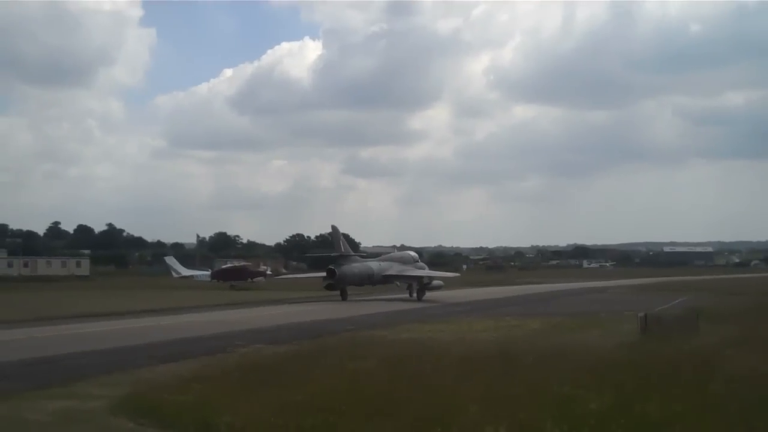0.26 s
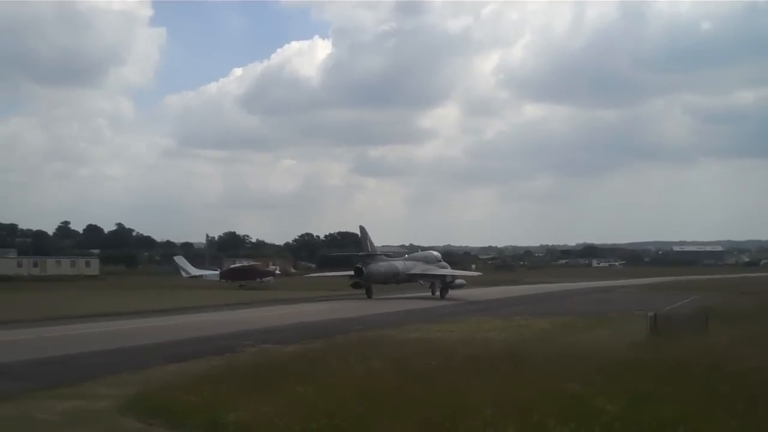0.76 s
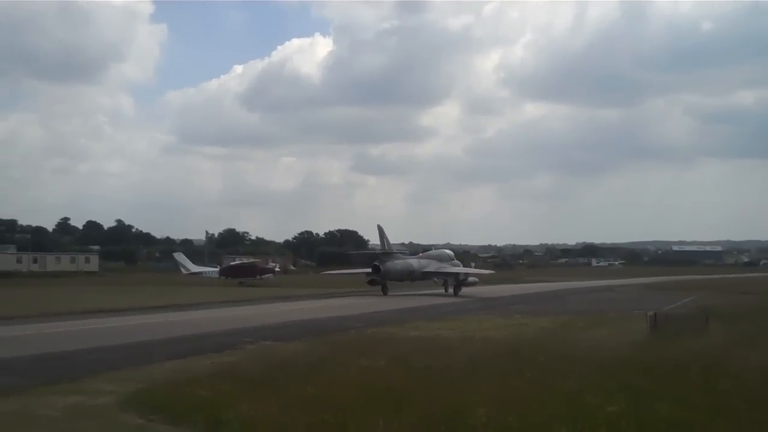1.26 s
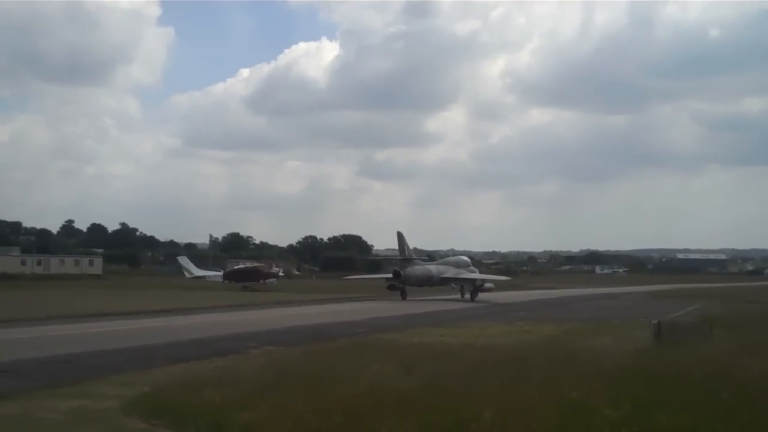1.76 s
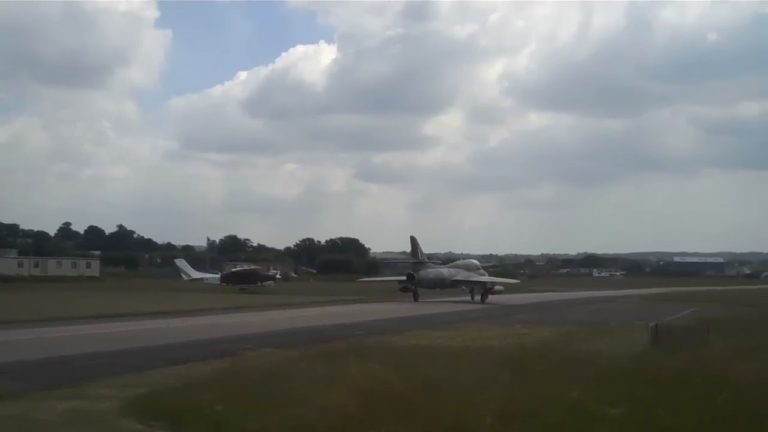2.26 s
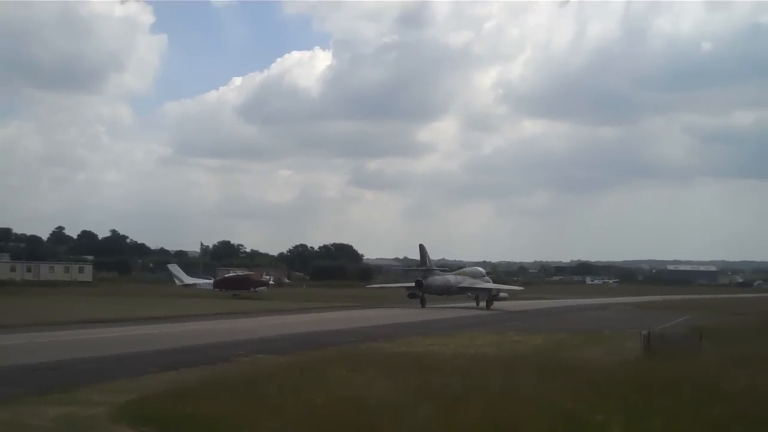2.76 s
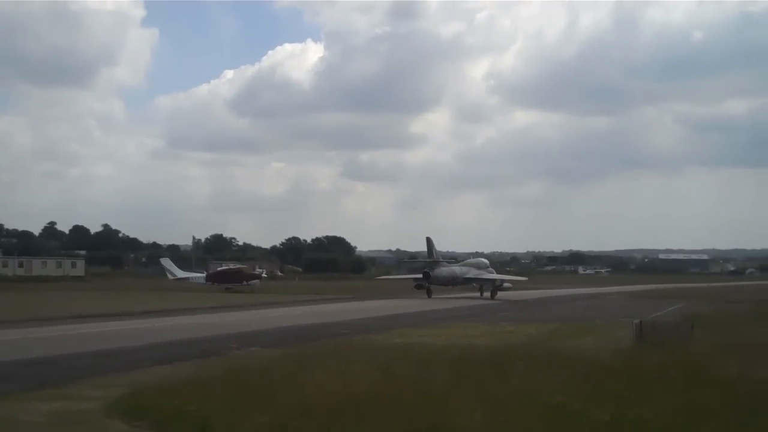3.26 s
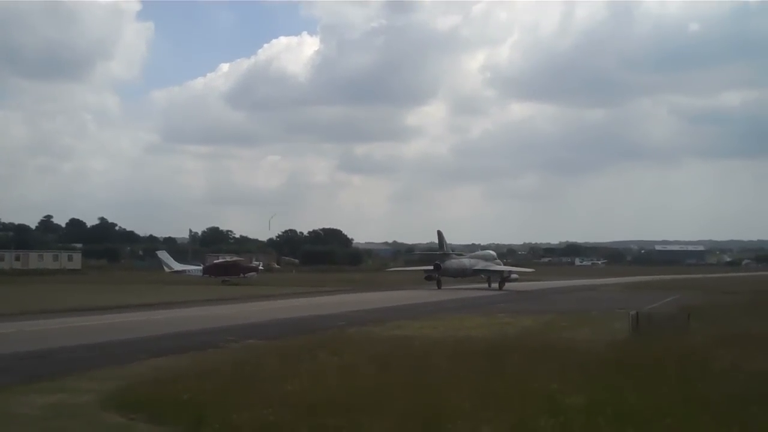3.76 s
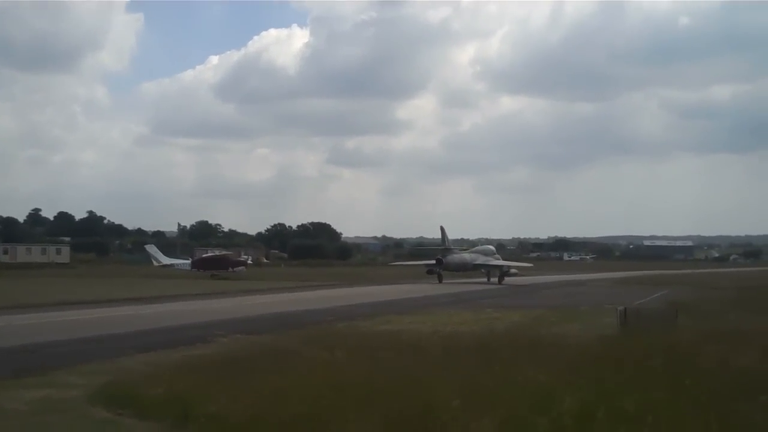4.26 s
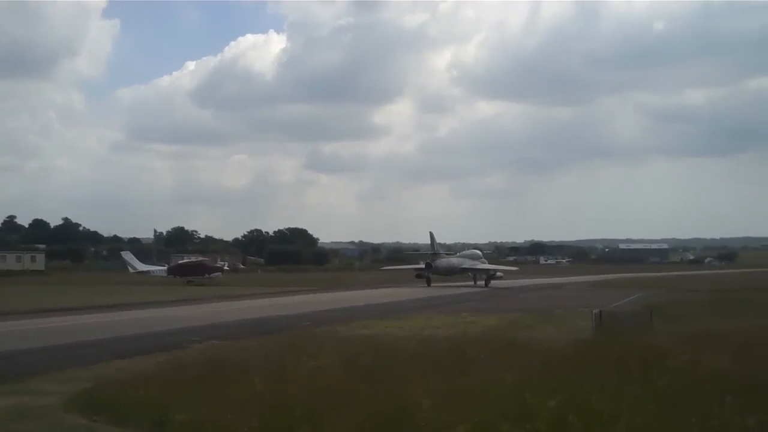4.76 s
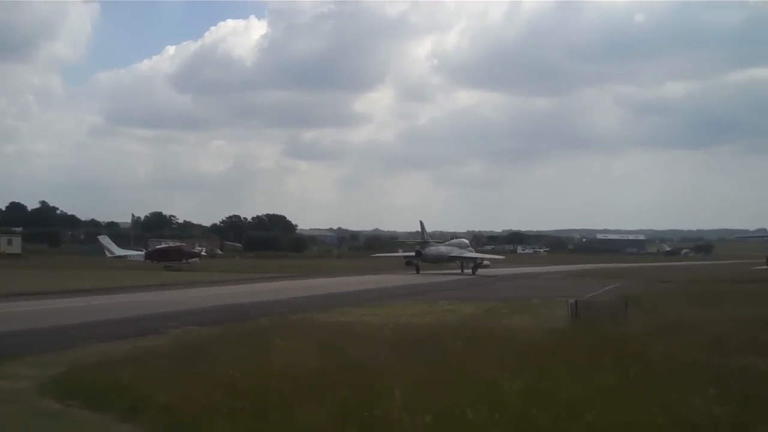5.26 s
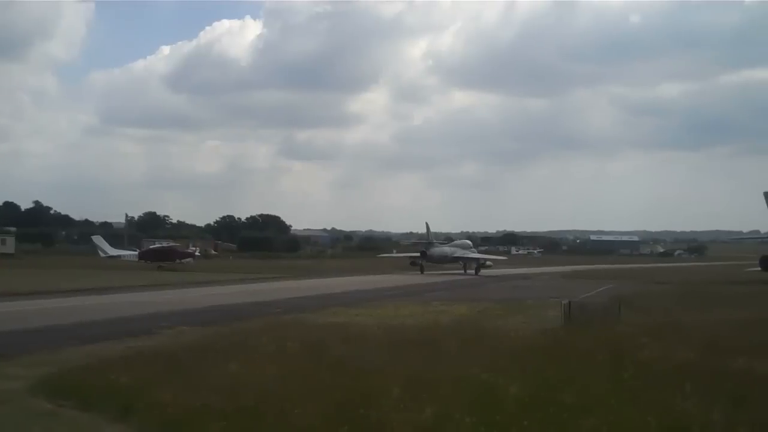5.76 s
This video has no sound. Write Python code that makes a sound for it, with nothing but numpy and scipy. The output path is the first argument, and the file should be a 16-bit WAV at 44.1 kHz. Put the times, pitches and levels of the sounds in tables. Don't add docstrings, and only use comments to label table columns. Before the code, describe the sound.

An outdoor stretch of about six seconds, already under way at the start: a jet aircraft taxies away over an open airfield. Its loud, broad roar has a hollow, ringing middle and a bright airy hiss. Above it sits a thin, piercing whine with several higher companion tones, glinting and breaking up in the turbulent air. The whine holds for about half a second, then glides steadily down, ending roughly a quarter lower. Around 2.8 s the jet's tone shifts slightly as its tail swings away; the roar and hiss keep fading, leaving the whine more exposed. Everything flutters in quick uneven swells. Low wind rumble and soft thumps strike a small bare microphone near 0.15, 1, 2 and 3 s; a dense burst of hard knocks and crackly snaps comes from about 4.1 to 4.6 s, followed by smaller bumps near 4.8 and 5.2 s. The engine is still audible at the end.

```python
import sys
import numpy as np
from scipy import signal
from scipy.fft import rfft, irfft
from scipy.io import wavfile
from scipy.ndimage import uniform_filter1d

SR = 44100
rng = np.random.default_rng(int(sys.argv[2]) if len(sys.argv) > 2 else 0)


def master_out(mix):
    frames = np.transpose(np.atleast_2d(mix))
    ceiling = np.clip(frames, -1, 1)
    pcm = np.round(ceiling * 32767).astype(np.int16)
    wavfile.write(sys.argv[1], SR, pcm)


def boost(x):
    u = np.asarray(x, float) / 20
    return 10 ** u


N = 264600
FRAME, HOP = 1024, 256

# middle_s, half_length_s
TAIL_SWING = (2.77, 0.13)


def clock():
    return np.arange(N) / SR


def evened(x):
    return x / np.sqrt(np.mean(x ** 2) + 1e-20)


def bell(x, middle, half):
    return np.exp(-((x - middle) / half) ** 2 / 2)


def humps(rows, stretch=0.94, share=0.95):
    t = clock()[::HOP]
    level_db = sum(share * db * bell(t, s, stretch * half) for s, half, db in rows)
    return np.interp(clock(), t, level_db)


def drift(rate_hz):
    draws_hz = 600
    count = N * draws_hz // SR + 1
    z = rfft(rng.standard_normal(count))
    hz = np.fft.rfftfreq(count, 1 / draws_hz)
    slow = evened(irfft(z * np.exp(-(hz / rate_hz) ** 2), count))
    return np.interp(np.linspace(0, count - 1, N), np.arange(count), slow)


def receding(layer, turn):
    start_db, fade_db, turn_db = layer
    middle_s, half_s = turn
    turned = (1 + np.tanh((clock() - middle_s) / half_s)) / 2
    return boost(start_db + fade_db * clock() + turn_db * turned)


def spectrum(points):
    f, level_db = np.transpose(points)
    hz = np.fft.rfftfreq(FRAME, 1 / SR)[:, None]
    return boost(np.interp(np.log(hz + 1), np.log(f + 1), level_db, -150, -150))


def resonances(peaks, shift_hz=np.zeros(N)):
    hz = np.fft.rfftfreq(FRAME, 1 / SR)[:, None] - np.pad(shift_hz[::HOP], (0, 4), "edge")
    power = sum(boost(2 * db) / (1 + (2 * (hz - f) / width) ** 2) ** 2.0 for f, width, db in peaks)
    return np.sqrt(power)


def noise(gain, patchy_db, flicker_db, flicker_hz):
    a, b = rng.standard_normal((N // HOP + 5, FRAME // 2 + 1, 2), np.float32).T
    patches = uniform_filter1d(uniform_filter1d(a[::-1], size=10, axis=0), size=10, axis=1)
    z = (a + 1j * b) * gain * boost(patchy_db * evened(patches))
    x = signal.istft(z, nperseg=FRAME, noverlap=FRAME - HOP)[1][:N]
    return evened(x * boost(flicker_db * drift(flicker_hz)))


def tone(hz, scattered, twinkle_hz):
    phase = 2 * np.pi * np.cumsum(hz) / SR
    in_phase = 1 + scattered * drift(twinkle_hz)
    quadrature = scattered * drift(twinkle_hz)
    return evened(in_phase * np.cos(phase) + quadrature * np.sin(phase))


def compressor():
    # time_s, first_stage_hz
    spool = [(0, 5792), (.55, 5790), (1, 5612), (1.5, 5457), (2, 5313), (2.5, 5195), (2.85, 5120),
             (3, 5104), (3.55, 5010), (4, 4835), (4.5, 4658), (5, 4534), (5.5, 4419), (6, 4330)]
    # ratio_to_first_stage, level_db
    neighbours = [(1.0635, -5), (1.089, -5.5), (1.03, -14), (1.135, -12)]
    rear_stages = [(1.283, -24), (1.325, -2), (1.358, 4), (1.447, -20), (1.544, 1), (1.642, 5), (1.732, -2),
                   (1.998, -1)]
    # middle_s, half_length_s, gain_db
    glints = [(0.0, 0.02, 9), (0.07, 0.028, 5), (0.16, 0.02, -4.5), (0.32, 0.02, 8.0), (0.65, 0.18, -5.5),
              (0.67, 0.02, 5.0), (0.83, 0.02, 6.5), (1.57, 0.03, 5), (1.0, 0.02, 5), (1.11, 0.066, 4.5),
              (1.36, 0.04, 4), (1.45, 0.02, 4), (1.66, 0.035, 9), (2.11, 0.096, 7.5), (2.35, 0.02, 11),
              (2.48, 0.023, -12), (2.54, 0.23, 8.5), (2.6, 0.028, 4), (2.78, 0.02, 7), (2.91, 0.018, -16),
              (3.05, 0.023, -17), (3.16, 0.018, -3), (3.18, 0.2, 14), (3.36, 0.028, -14), (3.51, 0.017, 11),
              (3.59, 0.022, 1), (3.65, 0.02, -3.5), (3.7, 0.02, 3), (3.75, 0.02, -7.5), (3.95, 0.02, 8.5),
              (4.04, 0.02, -5.0), (4.11, 0.1, 8), (4.25, 0.025, 6.5), (4.36, 0.047, -10), (4.52, 0.069, 12),
              (4.56, 0.019, -5), (4.61, 0.02, 5.5), (4.72, 0.02, -9.5), (4.81, 0.028, 6.5),
              (5.01, 0.018, -8.0), (5.05, 0.11, 8.5), (5.12, 0.018, 7), (5.3, 0.02, -12), (5.4, 0.03, 7),
              (5.5, 0.015, -9), (5.61, 0.02, 6), (5.75, 0.02, -11), (5.89, 0.18, 4),
              (2.87, .04, 6), (3.0, .04, 7), (4.15, .04, 3), (4.275, .02, 4), (1.15, .04, 3), (1.85, .08, 1)]
    # middle_s, half_length_s
    inlet_swing = (0.74, 0.79)
    rear_swing = (3.6, 0.49)
    # start_db, fade_db_per_s, turn_gain_db
    first_level = (-49, -1.4, 11.7)
    near_level = (-53.5, -0.18, 12)
    rear_level = (-61, 0, 5.5)

    hz = np.interp(clock(), *np.transpose(spool))
    glint_db = humps(glints, share=.95)
    first = receding(first_level, inlet_swing) * boost(glint_db) * tone(hz, .6, 65)
    near = sum(boost(db) * tone(ratio * hz, 0.94, 22) for ratio, db in neighbours)
    rear = 0
    for ratio, db in rear_stages:
        absorbed_db = 3 * np.maximum(ratio * hz / 1000 - 7.4, 0)
        rear = rear + boost(db - absorbed_db) * tone(ratio * hz, 1.4, 45)
    lowpass = signal.butter(3, 330, fs=SR, output="sos")
    wake = evened(signal.sosfilt(lowpass, rng.standard_normal(N)))
    hump = wake * np.cos(2 * np.pi * np.cumsum(1.07 * hz) / SR) * boost(2.0 * drift(24))
    stages = receding(near_level, inlet_swing) * (near + boost(6.0) * hump)
    return first, stages + receding(rear_level, rear_swing) * rear


def exhaust():
    # pitch_hz, density_db
    low_roar = [(320, -14), (430, -10), (520, -3.5), (610, -2.5), (720, -11), (800, -16.5), (900, -43)]
    high_roar = [(900, -9), (1030, -4), (1200, 1), (1450, 2), (1600, 2), (1750, -17)]
    # start_db, fade_db_per_s, turn_gain_db
    low_level = (-37.5, -1.48, -5.5)
    high_level = (-35, -2.28, 4.3)
    low = receding(low_level, TAIL_SWING) * noise(spectrum(low_roar), 0.65, 0.76, 11)
    high = receding(high_level, TAIL_SWING) * noise(spectrum(high_roar), 1.3, 0.2, 21)
    return low + high


def pipe():
    # pitch_hz, width_hz, level_db
    first_mode = [(906, 323, 0)]
    second_mode = [(1950, 480, 0), (1720, 140, -8.5)]
    fourth_mode = [(3388, 500, 0)]
    # offset_hz, width_hz, level_db
    third_mode = [(89, 480, 0.91), (-220, 210, -0.9)]
    # start_db, fade_db_per_s, turn_gain_db
    mode_levels = [
        (-35.5, -0.65, -7),
        (-24.5, -2.5, 0.7),
        (-26, -3, 2.5),
        (-31.5, -1.74, 0),
    ]
    third_hz = 2718 + 60.5 * drift(2.5)
    shapes = [resonances(first_mode), resonances(second_mode),
              resonances(third_mode, third_hz), resonances(fourth_mode)]
    return sum(receding(level, TAIL_SWING) * noise(shape, 1.1, .6, 25)
               for level, shape in zip(mode_levels, shapes))


def intake():
    # pitch_hz, density_db
    body_points = [(3300, -29), (3700, 2.5), (4200, 4), (5000, 3), (5800, 0), (6400, -27), (7000, -39)]
    fizz_points = [(3530, -63), (6000, 0.5), (6360, 0.5), (7420, -2), (11000, -11), (13800, -22)]
    # start_db, fade_db_per_s, turn_gain_db
    body_level = (-33, -2.98, 3.2)
    fizz_level = (-34.5, -2.1, 2.76)
    body = receding(body_level, TAIL_SWING) * boost(6) * noise(spectrum(body_points), 1.8, .6, 20)
    fizz = receding(fizz_level, TAIL_SWING) * noise(spectrum(fizz_points), 2.25, 0.17, 26)
    return boost(0.9 * drift(19)) * (body + fizz)


def swelling_and_dipping(x):
    # middle_s,
    # half_length_s, gain_db, centre_hz, half_width_octaves
    swells_and_dips = [(0.048, 0.062, 4.5, 2420, 0.26), (0.893, 0.11, 4, 6760, 0.47), (1.15, 0.043, 4.5, 3600, 0.84),
                             (1.27, 0.11, 7, 1890, 0.25), (1.445, .07, 2.5, 2050, 0.07), (1.59, 0.041, 8, 2980, 0.22),
                             (1.874, 0.31, 5, 627, 0.27), (1.98, 0.17, 7, 1370, 0.14), (2.337, 0.13, 6, 870, .2),
                             (2.346, 0.3, 3.5, 9060, 0.74), (2.545, 0.056, 6.5, 3030, 0.37),
                             (2.774, 0.063, 6.5, 2080, 0.1), (3.078, 0.047, 7, 1960, 0.042), (3.3, 0.055, 8, 2630, 0.13),
                             (3.24, 0.055, 4, 7900, 0.46), (3.28, 0.21, 3, 705, 1.04), (3.54, 0.037, 5, 2900, 0.25),
                             (3.72, 0.078, 12.5, 2390, 0.11), (3.996, 0.064, 4, 5860, 2), (4.158, 0.037, 7.5, 2070, 0.13),
                             (4.625, 0.11, 2.5, 1950, 0.25), (4.933, 0.27, 5, 1120, 0.33), (5.442, 0.18, 5, 1000, 0.12),
                             (5.984, 0.026, 2.5, 1120, 1.4),
                             (0.158, 0.044, -9, 2650, 0.26), (.43, 0.026, -5.7, 2380, 0.13), (0.476, 0.21, -6, 3360, 1.55),
                       (0.612, 0.043, -9, 1270, .16), (0.644, 0.041, -12, 2060, 0.068),
                       (0.877, 0.025, -3.5, 1770, .4), (1.01, 0.094, -3.5, 3340, 0.34), (1.172, 0.028, -9, 940, 0.23),
                       (1.29, 0.038, -7, 2240, 0.13), (1.64, 0.07, -7.5, 2420, 0.46), (1.937, 0.1, -3, 1060, 4.7),
                       (2.66, 0.028, -5.5, 1650, 0.32), (2.81, 0.068, -1.5, 3950, 0.33),
                       (2.985, 0.093, -3.5, 3430, 1.4), (3.554, 0.032, -6, 1160, 0.45),
                       (3.767, 0.049, -3.5, 6350, 0.94), (3.79, 0.17, -4, 1150, 0.68), (4.203, 0.035, -6, 3000, 0.21),
                       (4.34, 0.039, -6.3, 5730, 0.59), (5.196, 0.056, 4, 1970, 0.12), (5.338, 0.076, 2, 4400, 0.48),
                       (5.607, 0.34, -3, 8000, 0.75), (5.665, 0.16, -2.5, 700, 0.91),
                             (1.52, 0.041, 5, 2140, .08), (1.59, .04, 7.5, 2200, 0.064), (1.7, 0.023, 3, 1800, .08),
                        (1.1, 0.046, 5, 2820, .04), (1.31, .05, 5, 2850, .045), (1.56, 0.024, 3.5, 2800, .12),
                        (1.0, 0.055, 2.5, 1860, .1), (0.95, 0.043, 4, 2900, .06), (3.96, 0.03, 5, 9000, 0.4),
                        (0.83, 0.048, 2.5, 2000, 0.087), (0.06, 0.035, 5, 4100, 0.085), (0.64, 0.028, 5.5, 4800, .12),
                        (.2, .07, -1, 4800, 0.12), (1.96, .04, 5.5, 2930, .07), (1.5, 0.023, 6.5, 3460, 0.074),
                        (2.5, 0.036, -3.5, 2650, .1), (3.08, 0.024, 5, 3250, .07), (2.49, 0.016, 7, 3860, 0.17),
                        (3.5, 0.018, 9, 3220, 0.084), (2.69, 0.036, -6, 3000, 0.079), (1.72, .03, 5, 1920, 0.12),
                        (4.87, 0.25, 2.5, 5000, 0.06), (4.8, .05, -1, 1100, 0.17), (5.1, 0.023, 6, 8000, 0.49),
                        (3.13, .08, 1, 5400, .07), (1.7, .04, 2, 3600, 0.22), (1.73, .06, -3.5, 1960, .1),
                        (1.3, 0.1, -3.5, 2350, .06), (1.15, .07, 3.5, 3450, 0.045), (4.1, .04, 3.5, 4300, 0.11),
                        (3.09, 0.032, 3.5, 3300, 0.071), (1.155, .015, -3, 2000, .1), (1.24, 0.035, 1.5, 2040, .07),
                        (3.3, 0.037, 3, 4900, .1),
                             (0.043, 0.022, 5.5, 6800, 0.12), (0.32, 0.07, 4.0, 3660, 0.07), (0.59, 0.12, -2, 6000, 0.3),
                         (0.67, 0.03, -7, 2990, 0.12), (0.81, 0.07, -5, 1550, 0.12), (1.02, 0.04, -5.5, 2510, 0.07),
                         (1.12, 0.025, -6.5, 4000, 0.07), (1.608, 0.061, 2.5, 5770, 0.12),
                         (1.717, 0.025, -5, 3550, 0.22), (1.94, 0.07, 1, 1830, 0.055), (2.06, 0.025, 7, 3760, 0.11),
                         (2.12, 0.025, -8.5, 2990, 0.12), (2.28, 0.04, 3, 2790, 0.24), (2.38, 0.04, -6.5, 3530, 0.12),
                         (2.51, 0.025, 5.5, 2770, 0.12), (2.53, 0.025, -2, 4200, 0.22),
                         (2.62, 0.04, -5.0, 2600, 0.07), (2.63, 0.04, 2, 3940, 0.31), (2.837, 0.031, -5, 4220, 0.12),
                         (3.108, 0.04, -3, 2960, 0.12), (3.48, 0.036, 3, 7100, 0.22), (3.84, 0.11, -1.5, 2600, 0.12),
                         (3.87, 0.07, 5.5, 4300, 0.12), (3.92, 0.04, -5.0, 7350, 0.12), (4.02, 0.04, -5, 5200, 0.22),
                         (4.565, 0.025, 4, 8740, 0.45), (4.77, 0.07, 7, 4220, 0.07), (5.09, 0.028, -6.5, 8160, 0.44),
                         (5.18, 0.027, 6.5, 9050, 0.24), (5.29, 0.025, -4, 1900, 0.2)]
    # middle_s, half_length_s, gain_db, centre_hz
    flares = [(0.31, 0.061, 4.5, 2820), (0.767, 0.037, 8, 3700), (0.92, .04, 0.5, 2840),
              (1.18, .05, 3.5, 2570), (1.27, 0.071, 2, 2700), (1.74, 0.092, 7, 2280),
              (1.577, 0.031, 4.5, 2740), (2.26, 0.062, 5, 4100), (3.215, 0.09, 7, 3200),
              (3.49, 0.092, 7, 4500), (3.915, 0.028, 10.5, 2620), (4.024, 0.069, 7.5, 3250),
              (4.185, 0.061, 8, 4250), (4.1, 0.11, -6, 1050), (4.43, 0.1, -7, 2220), (4, 0.059, 4.5, 4900),
              (5.19, 0.14, -4.5, 3360), (5.5, 0.54, -1, 2000), (5.835, 0.2, 3, 2900),
              (0.46, 0.28, -3.5, 4560), (2.3, 0.017, -13, 2750), (2.1, 0.063, 7, 880),
              (4, 0.037, -5.5, 4400), (2.2, .04, -1.5, 5900), (0.7, 0.077, -2, 3300), (1.6, 0.099, 0, 5400),
              (4.26, 0.032, 0, 5300), (0.3, 0.065, 3, 2040)]
    flare_octaves = 0.11

    hz, t, z = signal.stft(x, SR, nperseg=FRAME, noverlap=FRAME - HOP)
    octave = np.log2(hz + 1)[:, None]
    level_changes = swells_and_dips + [(*row, flare_octaves) for row in flares]
    change_db = sum(db * bell(t, s, half) * bell(octave, np.log2(centre_hz), wide)
                  for s, half, db, centre_hz, wide in level_changes)
    return signal.istft(z * boost(change_db), SR, nperseg=FRAME, noverlap=FRAME - HOP)[1][:N]


def wind():
    # pitch_hz, density_db
    rumble_points = [(15, -54), (40, -31), (80, -6.5), (125, 0), (165, -5), (210, -5), (235, -30)]
    buffet_points = [(150, -25), (220, -2), (300, -2), (420, -7), (700, -12), (1200, -24)]
    # middle_s, half_length_s,
    # gain_db
    gusts = [(.15, 0.26, 12.5), (.62, 0.1, -4), (0.807, 0.054, 9.5), (0.974, 0.11, 13.5), (1.42, 0.25, -15),
             (1.13, .04, -10), (1.84, 0.082, 11), (1.7, 0.041, -7), (2.274, 0.14, 13.5), (2.97, 0.046, 5.5),
             (3.46, .05, 1), (2.5, .05, 2), (3.07, 0.14, 4), (3.342, 0.21, 6), (3.6, 0.022, -13),
             (3.72, 0.049, 9), (3.98, 0.016, 8), (4.068, 0.087, 15), (4.262, 0.046, 15), (4.41, 0.033, 21),
             (4.52, 0.043, 19), (4.672, 0.06, 9.5), (4.854, 0.094, 17.5), (5.155, 0.067, 18.5),
             (5.395, 0.066, 8), (5.57, 0.022, -7), (5.76, 0.029, 12), (5.92, 0.057, 9)]
    heaves = [(0.0, 0.02, 0.5), (0.16, 0.094, 2.5), (0.68, 0.022, -6), (0.86, 0.048, 5), (1.11, 0.028, -6),
              (1.39, 0.22, -5), (1.54, 0.023, -3.5), (1.81, 0.018, -4), (1.96, 0.02, 3.5), (2.01, 0.02, -2),
              (2.07, 0.02, -1), (2.15, 0.02, -3.5), (2.31, 0.018, -3.0), (2.38, 0.028, 5), (2.69, 0.15, -7),
              (2.74, 0.024, 9), (3.14, 0.051, -3), (3.59, 0.028, -2), (3.59, 0.15, -9), (3.83, 0.02, -8.5),
              (3.88, 0.02, 7), (3.93, 0.02, -5), (4.09, 0.018, 6), (4.25, 0.034, 2), (4.49, 0.04, 5),
              (4.62, 0.18, 4.5), (4.7, 0.02, -5), (4.77, 0.016, 1.5), (4.83, 0.04, 2), (4.94, 0.02, 5),
              (5.01, 0.02, -3.0), (5.18, 0.12, 7.5), (5.54, 0.02, -5), (5.65, 0.04, -5), (5.84, 0.02, -8),
              (5.9, 0.02, 4.5)]
    # time_s, peak_db, pitch_hz, direction (+1 push, -1 pull)
    eddies = [(0.1473, -14, 368, 1), (0.158, -16, 195, -1), (0.9945, -14.5, 302, 1), (1.957, -18, 408, 1),
              (2.057, -18.5, 220, -1), (3.0479, -17, 242, -1), (4.069, -21, 315, -1), (4.092, -14, 407, -1),
              (4.1064, -19, 260, 1), (4.1917, -15, 320, 1), (4.234, -17, 250, 1), (4.259, -16.5, 199, -1),
              (4.331, -17.5, 300, 1), (4.381, -18, 230, 1), (4.401, -20, 225, -1), (4.427, -18, 400, 1),
              (4.4527, -9.5, 280, -1), (4.49, -9.5, 258, -1), (4.4974, -10, 324, -1),
              (4.5153, -12, 293, -1), (4.5221, -14, 200, -1), (4.5439, -21, 223, 1), (4.556, -16, 271, -1),
              (4.5632, -18, 214, -1), (4.788, -17, 293, -1), (4.7998, -18.5, 132, -1),
              (4.8486, -14.5, 232, 1), (5.155, -27, 368, -1), (5.1607, -21, 190, -1),
              (5.2645, -20.5, 158, -1)]
    # time_s, peak_db, pitch_hz
    faint_eddies = [(0.081, -21, 130), (4.0938, -13, 170), (4.483, -16, 230), (4.758, -26, 150),
                    (4.856, -21, 500), (4.93, -22.5, 156), (5.136, -25, 160), (5.21, -23, 199),
                    (5.548, -24, 188), (5.581, -29, 156), (5.74, -23, 450), (5.779, -21, 191),
                    (5.918, -20, 167)]
    snaps = [(4.0915, -11, 750), (4.107, -19, 800), (4.137, -25, 600), (4.194, -22, 650), (4.259, -25, 800),
             (4.33, -21, 600), (4.403, -22, 640), (4.49, -15, 900), (4.525, -21, 950), (4.5625, -13, 950),
             (5.154, -15, 750), (5.128, -20, 600)]
    crest_share = .22

    buffet_db = -51 + humps(gusts)
    rumble_db = -41 - 0.83 * (clock() - 3) + humps(heaves)
    lumps = boost(3.2 * drift(44))
    rumble = lumps ** .4 * noise(spectrum(rumble_points), .5, .3, 7.4)
    buffet = lumps * noise(spectrum(buffet_points), 0.62, 3.15, 67)
    out = boost(rumble_db) * evened(rumble) + boost(buffet_db) * evened(buffet)
    t = np.arange(-600, 600) / SR
    for s, peak_db, hz, way in eddies + [(*row, -1) for row in faint_eddies + snaps]:
        swing = np.cos(2 * np.pi * hz * t) * np.exp(-(1.7 * hz * t) ** 2)
        crest = np.cos(2 * np.pi * 2.5 * hz * t) * np.exp(-(3.8 * hz * t) ** 2)
        pulse = (1 - crest_share) * swing + crest_share * crest
        at = round(s * SR) - len(t) // 2
        out[at:at + len(t)] += np.sign(way) * boost(peak_db - 4.0) * pulse
    return out


def scene():
    first, stages = compressor()
    engine = first + swelling_and_dipping(stages + exhaust() + pipe() + intake())
    return (engine + wind())[None]


def gain_offset():
    # top_s, creep_s, top_thousandths of full scale
    creeps = [
        (.78, .38, 3.3),
        (2.1, .15, 4),
        (3.14, .16, 5.5),
        (3.95, .13, 6.5),
        (4.76, .4, 16),
    ]
    drop_s = .13
    return sum(np.interp(clock(), [s - creep, s, s + drop_s], [0, top / 1000, 0])
               for s, creep, top in creeps)


def thinned(x):
    # pitch_hz, threshold_db
    threshold = [(3000, -30), (6500, -14), (9000, -5), (11000, -1.5), (13500, 1.5)]
    hz, t, z = signal.stft(x, SR, "cosine", nperseg=2 * FRAME)
    power = uniform_filter1d(abs(z) ** 2, size=3, axis=0)
    around = uniform_filter1d(uniform_filter1d(power, size=41, axis=0), size=3, axis=1)
    threshold_db = np.interp(hz, *np.transpose(threshold))[:, None]
    ragged_db = 3.5 * evened(uniform_filter1d(rng.standard_normal(z.shape), size=8, axis=0))
    top_hz = 13600 + 260 * evened(uniform_filter1d(rng.standard_normal(len(t)), size=2))
    strong = power > around * boost(2 * (threshold_db + ragged_db))
    keep = strong & (hz[:, None] < top_hz)
    return signal.istft(z * keep, SR, "cosine", nperseg=2 * FRAME)[1][:N]


def low_pass(x):
    return signal.sosfilt(signal.butter(12, 13910, fs=SR, output="sos"), x)


def record(dry):
    mix = thinned(dry[0] + gain_offset())[None]
    return low_pass(mix)


dry = scene()
out = record(dry)
master_out(out)
```